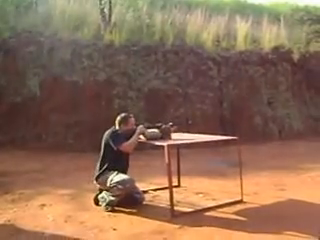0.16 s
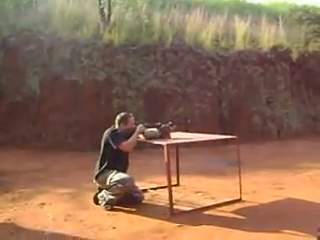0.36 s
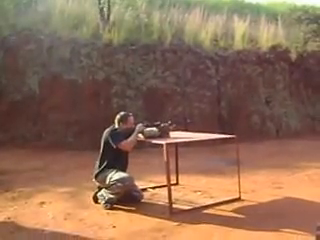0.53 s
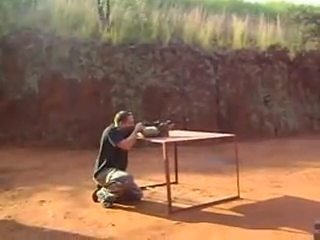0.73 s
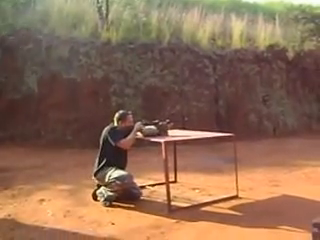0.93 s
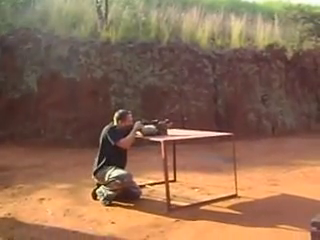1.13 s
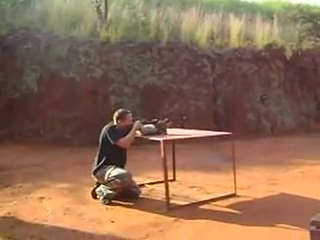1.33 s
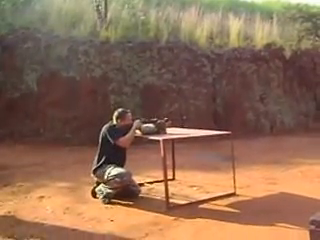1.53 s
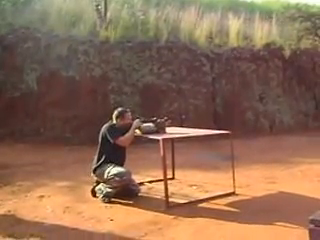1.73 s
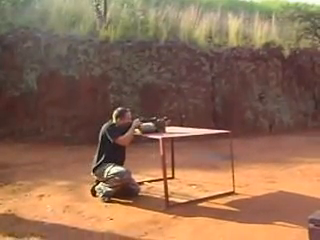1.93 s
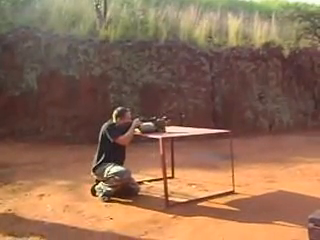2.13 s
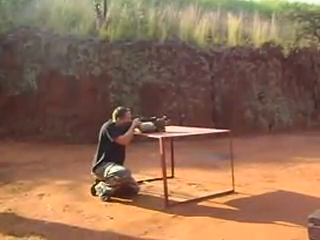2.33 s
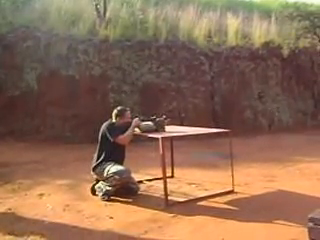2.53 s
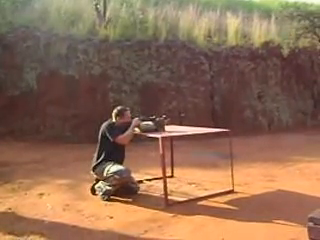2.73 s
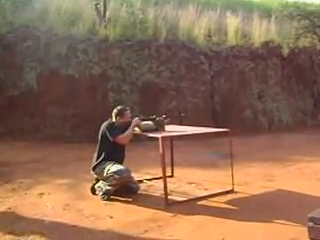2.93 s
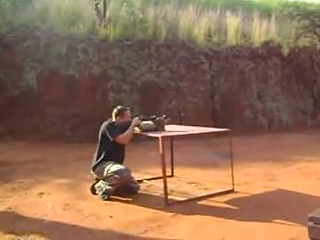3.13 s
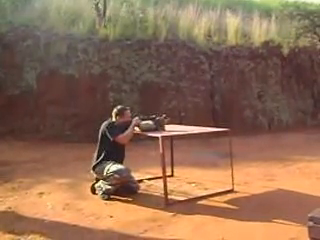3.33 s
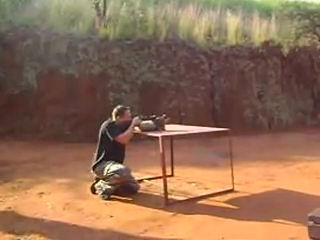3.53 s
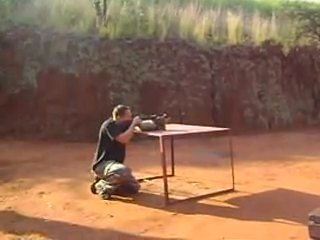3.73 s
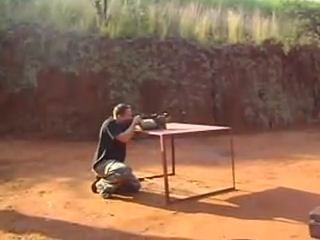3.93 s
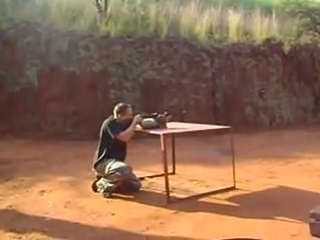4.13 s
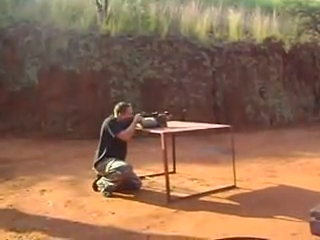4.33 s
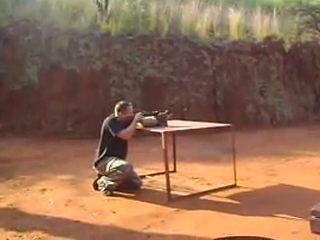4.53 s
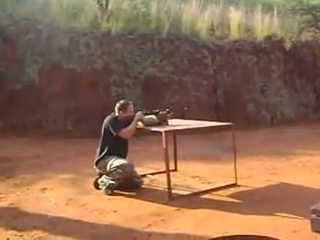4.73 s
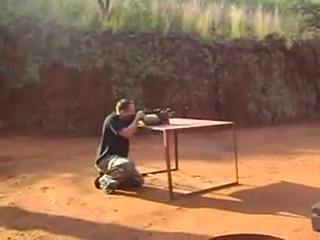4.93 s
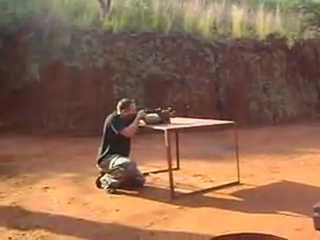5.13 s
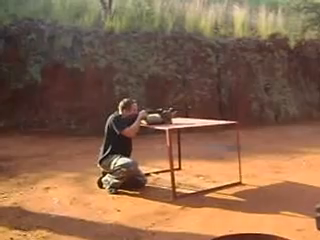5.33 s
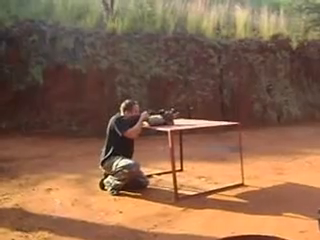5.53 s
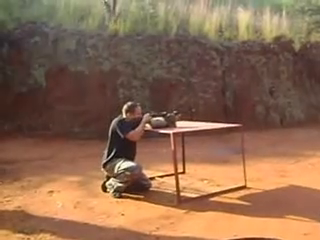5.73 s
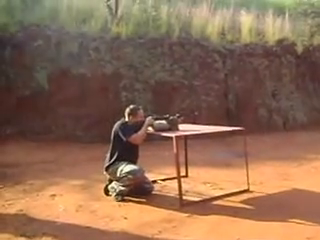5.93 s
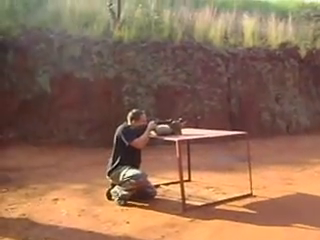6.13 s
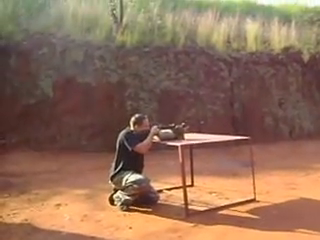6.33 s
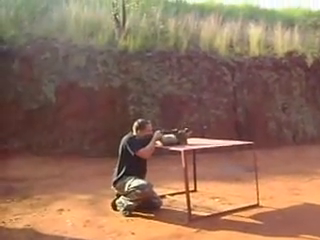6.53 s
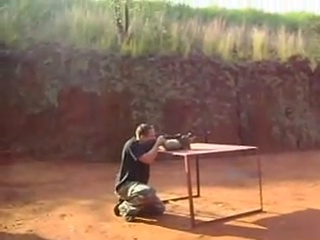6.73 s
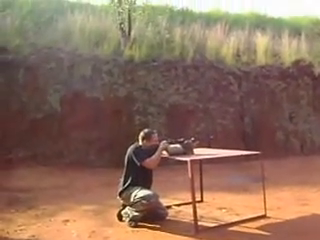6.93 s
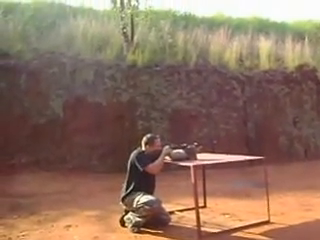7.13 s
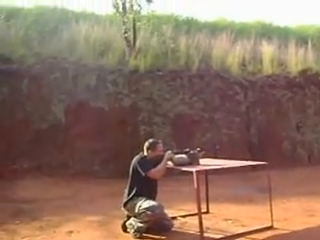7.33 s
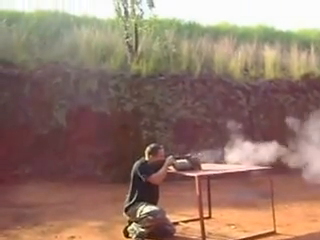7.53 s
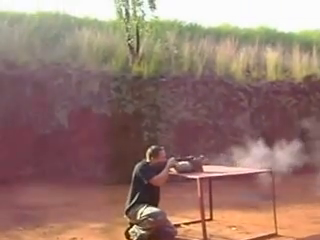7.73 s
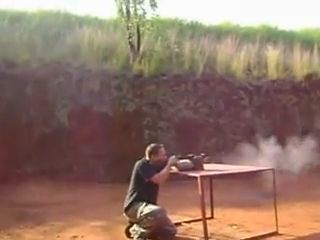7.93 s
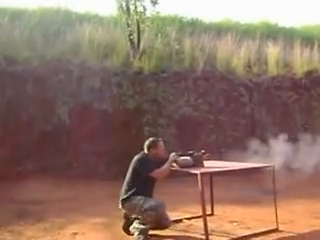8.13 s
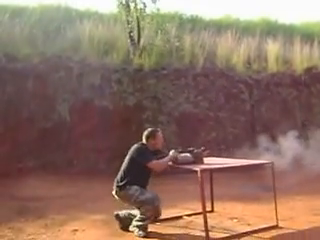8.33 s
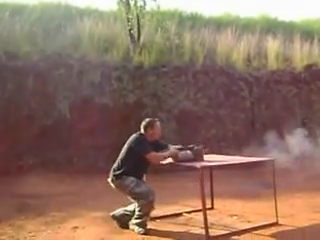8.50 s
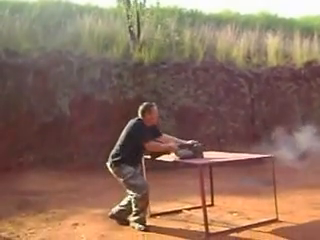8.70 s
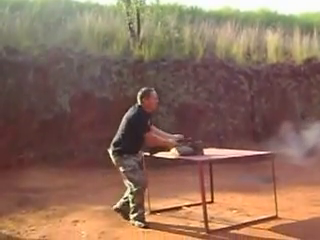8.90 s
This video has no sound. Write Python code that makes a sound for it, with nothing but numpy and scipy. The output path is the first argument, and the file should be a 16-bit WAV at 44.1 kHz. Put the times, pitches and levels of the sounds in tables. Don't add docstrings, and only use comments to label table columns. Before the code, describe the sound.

A dove coos softly over faint hiss outdoors, a distant pop comes early, then one huge distorted rifle shot booms and rolls away between earth banks.

```python
import sys
import numpy as np
from scipy import signal
from scipy.fft import rfft, irfft
from scipy.io import wavfile

SR = 44100
rng = np.random.default_rng(int(sys.argv[2]) if len(sys.argv) > 2 else 0)


def log_audio(samples):
    frames = np.atleast_2d(samples).T
    limited = np.clip(frames, -1, 1)
    pcm = np.round(limited * 32767).astype(np.int16)
    wavfile.write(sys.argv[1], SR, pcm)


def volts_from_db(level):
    exponent = np.asarray(level, float) / 20
    return 10 ** exponent


N = 395224
SHOT_S = 7.5247

# frequency in Hz, density in dB per Hz.
HISS_COLOUR = [(76, -41), (130, -5.5), (241, -4), (435, -3.5), (625, -4), (695, -1.5), (998, -3.5),
               (4800, -8.5)]
# time in seconds, level in dB.
RUMBLE_LEVEL = [(0.0, -77), (2.65, -82), (5.0, -79.5), (6.9, -78)]
# frequency in Hz, density in dB per Hz.
RUMBLE_COLOUR = [(11, -31.5), (18, -4), (70, -3.5), (113, -7), (140, -15.5), (180, -41), (310, -120)]
# peak time in seconds, level in dB, rise T60 in seconds, fall T60 in seconds.
DRONE = [
    (3.5, -71.5, 3.8, 18.0),
    (7.85, -50.5, .6, 1.5),
    (8.42, -60, .5, .35),
]
# frequency in Hz, density in dB per Hz.
DRONE_COLOUR = [(45, -32.5), (60, -1), (68, 3), (76, -1.5), (100, -33)]

# start in seconds, peak level in dB, length in seconds.
ROLLED_NOTES = [(0.054, -62.5, 0.44), (1.477, -58, 0.376), (2.868, -59, 0.385), (4.255, -58.5, 0.39),
                (5.642, -58.5, 0.426), (7.093, -57.5, 0.42)]
# start in seconds, peak level in dB, length in seconds.
SHORT_NOTES = [(0.56, -53, 0.062), (1.967, -52.5, 0.077), (3.334, -51.5, 0.07), (4.739, -50, 0.062),
               (6.149, -48.5, 0.061)]
# start in seconds, peak level in dB, length in seconds.
ARCHED_NOTES = [(1.029, -54, 0.1), (2.438, -54, 0.11), (3.813, -53.5, 0.11), (5.242, -52.5, 0.1),
                (6.64, -51, 0.097)]
# top pitch in Hz, place of the top from 0 to 1, sag at the start
# in Hz, sag at the end in Hz, flutter from 0 to 1.
ROLLED_RULE = (862, .5, 45, 10, 1)
SHORT_RULE = (880, .5, 130, 110, 0)
ARCHED_RULE = (928, .34, 90, 235, 0)
# delay in seconds, level in dB.
BANK_ECHOES = [(.002, -8), (.03, -18), (.068, -11.5), (.09, -15), (.115, -19), (.145, -21), (.19, -24)]

# peak time in seconds, level in dB, rise T60 in seconds, fall T60 in seconds.
POP_TAIL = [(.17, -32, .09, 0.27)]
# frequency in Hz, density in dB per Hz.
POP_COLOUR = [(150, -66.5), (250, -44), (487, -13.5), (609, -15), (789, -3.5), (974, -14), (1280, -22),
              (1600, -9), (2520, -15), (2820, -22), (3150, -18), (4800, -18.5)]
# peak time in seconds, level in dB, rise and fall T60 in seconds.
POP_RING = [(.27, -63, .3, .2)]
# frequency in Hz, density in dB per Hz.
POP_RING_COLOUR = [(3000, -36), (3500, -3), (3700, 4), (3950, -7), (4500, -39)]

# frequency in Hz, density in dB per Hz.
BODY_COLOUR = [(210, -26), (350, -2), (410, -2), (498, -4), (791, 4), (1050, 0), (1150, 0.5), (1500, -13),
               (1950, -38), (3300, -120)]
BOOM_COLOUR = [(29, -51), (50, -17), (210, 0.5), (260, -3.5), (308, 1), (398, -25.5), (420, -14),
               (550, -40.5), (920, -120)]
BRIGHT_COLOUR = [(790, -29), (1350, -0.5), (1490, -7), (1740, -2), (2050, -6.5), (4340, -12.5), (4800, -15)]
# front in dB, return in dB, roll in dB, roll T60 in seconds, haze in dB.
BODY_WAVES = (14, -10, -13.5, 1.18, -47.5)
BOOM_WAVES = (5.5, -9, -7, 0.7251, -52.5)
BRIGHT_WAVES = (14, -14, -11, 1.034, -74)
# frequency in Hz, level in dB, T60 in seconds.
SWING = [(22.2, -22.5, 0.25), (38, -27.5, 0.4), (12, -25, 0.92)]
# start in seconds, peak level in dB, top frequency in Hz.
SLAPS = [
    (7.636, 4, 900),
    (7.66, 6, 950),
    (7.684, 4, 400),
    (7.693, 5, 1500),
    (7.707, 1, 500),
]
# peak time in seconds, level in dB.
FAR_RETURNS = [(8.412, -51), (8.434, -47.5), (8.468, -52.5), (8.49, -53), (8.508, -48), (8.533, -55),
               (8.59, -56.5), (8.664, -57.5), (8.72, -59), (8.758, -54.5), (8.845, -57), (8.9, -62)]
# frequency in Hz, density in dB per Hz.
FAR_COLOUR = [(300, -45), (560, -13), (700, -9), (780, 3), (850, -4.5), (950, -3.5), (1150, -11.5),
              (1600, -20), (1760, -10), (1850, -11), (1960, -16), (2400, -23), (5000, -46)]
# frequency in Hz, gain in dB.
BAND_TOP = [(4700, -0.5), (5100, -2), (5500, -9.5), (6000, -12), (6500, -21.5), (7000, -37.5), (7250, -58),
            (7400, -88.5)]


def rms_one(x):
    return x / np.sqrt(np.mean(x ** 2) + 1e-20)


def shaped(x, spectrum):
    hz, db = np.transpose(spectrum)
    grid = np.log(np.arange(N // 2 + 1) * SR / N + 1)
    gain = volts_from_db(np.interp(grid, np.log(hz), db))
    return irfft(gain * rfft(x), N)


def coloured_noise(spectrum):
    return rms_one(shaped(rng.standard_normal(N), spectrum))


def wander(per_s):
    knots = rng.standard_normal(int(N / SR * per_s) + 2)
    return 1.1 * np.interp(np.arange(N) / SR * per_s, np.arange(len(knots)), knots)


def lumps(rows):
    t = np.arange(0, N + 16, 16) / SR
    power = np.zeros(len(t))
    for s, db, rise_t60, fall_t60 in rows:
        decay_db = 60 * np.maximum((s - t) / rise_t60, (t - s) / fall_t60)
        power += volts_from_db(db - decay_db) ** 2
    return np.interp(np.arange(N) / SR, t, np.sqrt(power))


def front(s, peak_db, rise_t60, fade_s):
    t = np.arange(N) / SR - s
    return volts_from_db(peak_db - np.where(t < 0, -60 * t / rise_t60, 20 * (t / fade_s) ** 2))


def after(start_s, rise_s):
    return np.clip((np.arange(N) / SR - start_s) / rise_s, 0, 1)


def background():
    hiss = volts_from_db(-59.5) * coloured_noise(HISS_COLOUR)
    s, db = np.transpose(RUMBLE_LEVEL)
    rumble_db = np.interp(np.arange(N) / SR, s, db) + 4.0
    rumble = volts_from_db(rumble_db) * coloured_noise(RUMBLE_COLOUR)
    return hiss + rumble + lumps(DRONE) * coloured_noise(DRONE_COLOUR)


def coo(notes, rule):
    trill_hz, sweep_hz, rough_hz, choke_depth = 35.6, 105, 40, .56
    edge_s, onset_s, accent_db, swell_db = .007, .04, 6.0, 3.0
    top_hz, top_at, sag_in_hz, sag_out_hz, trill = rule
    out = np.zeros(N)
    pace, waver = wander(45), wander(170)
    strength = .4 * wander(25) + 1.5 * wander(240)
    for (s, peak_db, length), tune in zip(notes, rng.standard_normal(len(notes))):
        t = np.arange(round(length * SR)) / SR
        first = round((s - .004) * SR)
        span = slice(first, first + len(t))
        off = t / length - top_at
        sag_in = sag_in_hz * (off / top_at) ** 2
        sag_out = sag_out_hz * (off / (1 - top_at)) ** 2
        hz = top_hz - np.where(off < 0, sag_in, sag_out)
        flutter = trill * (1 - .7 * np.exp(-t / onset_s))
        edge = np.clip(1 - np.minimum(t, length - t) / edge_s, 0, 1)
        db = accent_db * (trill - flutter) + trill * swell_db * t / length - 3.0 - 14 * edge
        beat = 2 * np.pi * np.cumsum(trill_hz * (1 + .06 * pace[span])) / SR
        swing_hz = sweep_hz * np.cos(beat) + rough_hz * np.tanh(waver[span])
        pitch = hz * (1 + .006 * tune) - flutter * swing_hz
        choke = np.clip(.5 - np.sin(beat), 0, 1.5) + .75 * np.cos(2 * beat) ** 6
        opening = 1 - flutter ** 2 * choke_depth * choke
        level_db = peak_db + db + flutter * 5 * np.tanh(.6 * strength[span])
        out[span] += np.sin(2 * np.pi * np.cumsum(pitch) / SR) * opening * volts_from_db(level_db)
    return out


def dove():
    direct = volts_from_db(3) * coo(ROLLED_NOTES, ROLLED_RULE)
    direct += volts_from_db(2.0) * (coo(SHORT_NOTES, SHORT_RULE) + coo(ARCHED_NOTES, ARCHED_RULE))
    echoes = np.zeros(SR // 2)
    spreads, sizes = rng.uniform(-1, 1, (2, len(BANK_ECHOES), 9))
    for (s, db), spread, size in zip(BANK_ECHOES, spreads, sizes):
        arrivals = ((s + .012 * (1 + spread)) * SR).astype(int)
        echoes[arrivals] = volts_from_db(db - 4.8) * size
    shimmer = volts_from_db(2.5 * np.tanh(wander(160)))
    return direct + shimmer * signal.fftconvolve(direct, echoes)[:N]


def far_pop():
    level = np.hypot(front(0.1605, -29.5, 0.072, 0.077), lumps(POP_TAIL))
    burst = level * volts_from_db(0.84 * wander(179)) * coloured_noise(POP_COLOUR)
    thin_return = lumps(POP_RING) * coloured_noise(POP_RING_COLOUR)
    return after(0.1528, 0.0032) * burst + thin_return


def n_wave(s, peak_db, length_s):
    share = (np.arange(N) / SR - s) / length_s
    return volts_from_db(peak_db) * (1 - 2 * share) * (share >= 0) * (share < 1)


def waves(front_db, return_db, roll_db, roll_t60, haze_db):
    rise_s, return_fade_s = 0.0027, .085
    power = front(SHOT_S + rise_s, front_db, 4 * rise_s, 0.092) ** 2
    power += front(SHOT_S + 0.13, return_db, 0.04, return_fade_s) ** 2
    power += front(SHOT_S + .222, return_db - 14.5, .1, return_fade_s) ** 2
    tail = lumps([(SHOT_S, roll_db, 1, roll_t60), (SHOT_S, haze_db, 1, 4.0)])
    return np.sqrt(power + tail ** 2)


def shot():
    field = waves(*BODY_WAVES) * coloured_noise(BODY_COLOUR)
    field += waves(*BOOM_WAVES) * coloured_noise(BOOM_COLOUR)
    field += waves(*BRIGHT_WAVES) * coloured_noise(BRIGHT_COLOUR)
    return after(SHOT_S, .0003) * field - n_wave(SHOT_S, 6, .0006)


def swing():
    t = np.maximum(np.arange(N) / SR - SHOT_S, 0)
    return sum(volts_from_db(db - 60 * t / t60) * np.sin(2 * np.pi * hz * t) for hz, db, t60 in SWING)


def slaps():
    length = 2600
    out, t = np.zeros(N), np.arange(length) / SR
    for s, peak_db, top_hz in SLAPS:
        band = signal.butter(1, [0.4 * top_hz, 0.93 * top_hz], "band", fs=SR, output="sos")
        grit = signal.sosfilt(band, rng.standard_normal(length))
        first = round(s * SR)
        out[first:first + length] += rms_one(grit) * volts_from_db(peak_db - 9 - 700 * t)
    return out


def far_returns():
    level = lumps([(s, db, 0.16, 0.3) for s, db in FAR_RETURNS])
    return level * volts_from_db(2.0 * wander(90)) * coloured_noise(FAR_COLOUR)


def scene():
    floor = background()
    blast = shot() + slaps() + far_returns()
    return (blast + far_pop() + dove() + floor)[None]


def roll_off(x):
    return signal.sosfilt(signal.butter(12, 15670, fs=SR, output="sos"), x)


def record(dry):
    input_top = 1.07
    loud = dry / (1 + (dry / input_top) ** 6) ** (1 / 6)
    narrow = shaped(loud, BAND_TOP) + swing()
    finished = np.clip(narrow, -.975, .975)
    return roll_off(finished)


dry = scene()
out = record(dry)
log_audio(out)
```